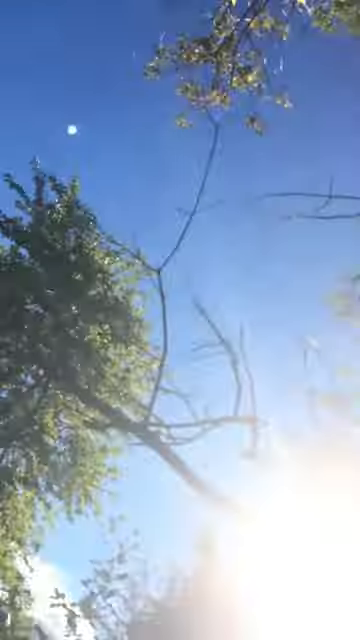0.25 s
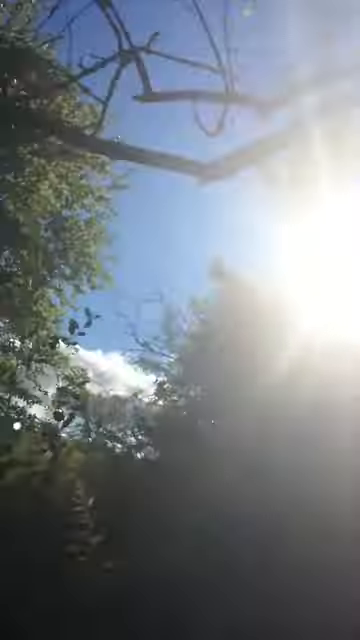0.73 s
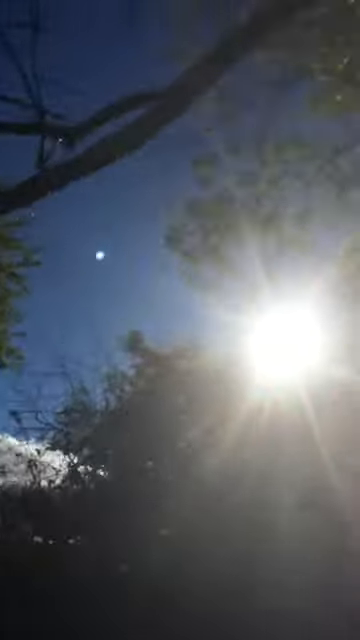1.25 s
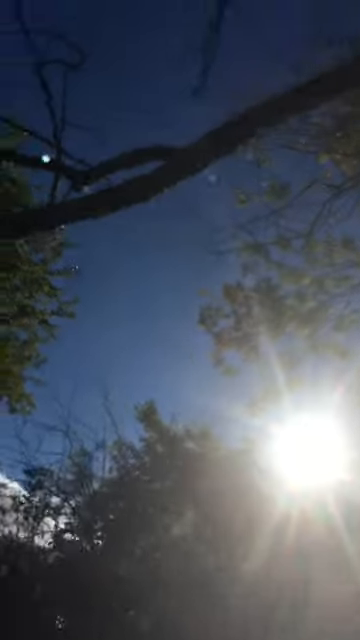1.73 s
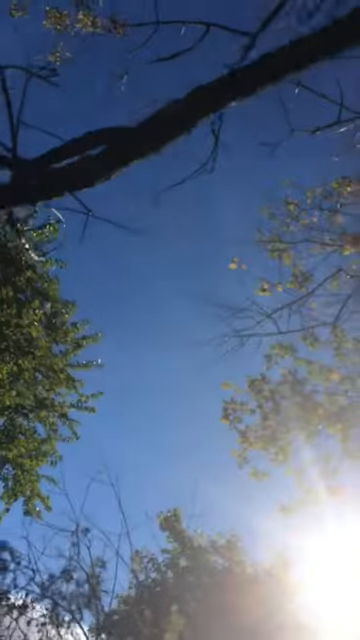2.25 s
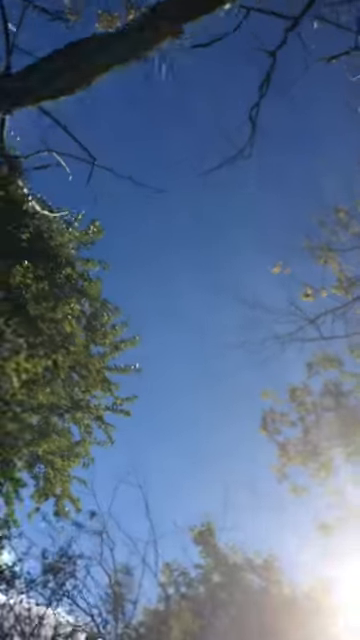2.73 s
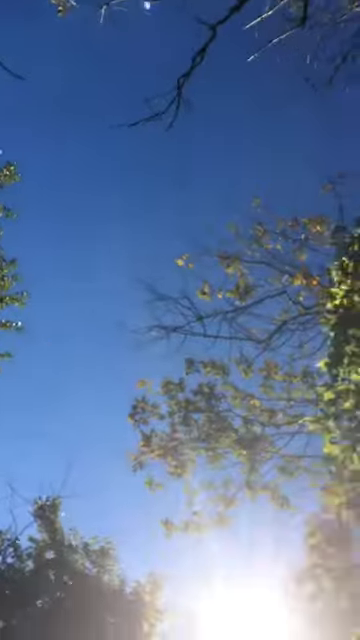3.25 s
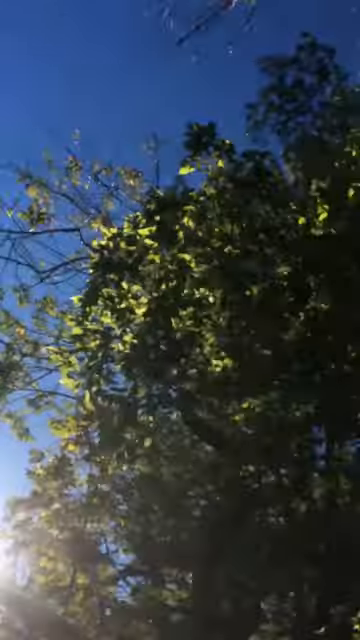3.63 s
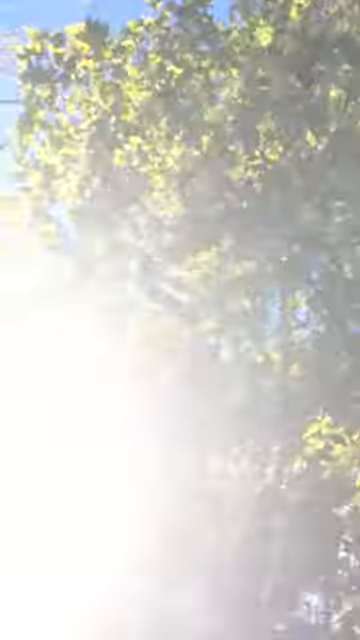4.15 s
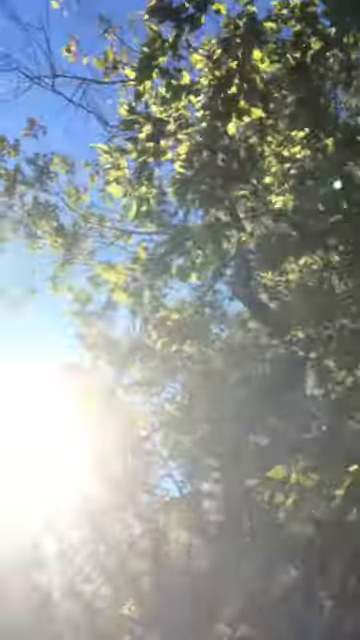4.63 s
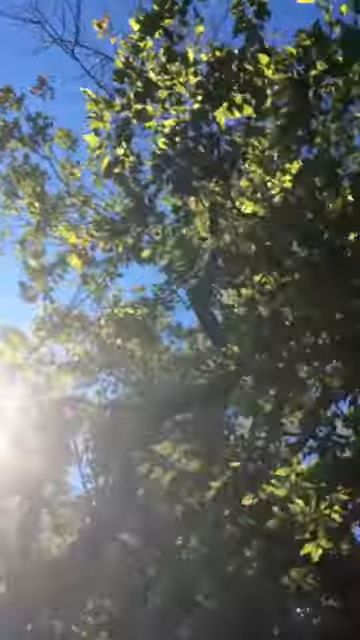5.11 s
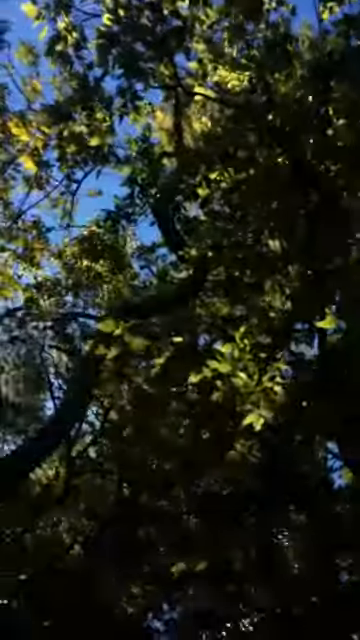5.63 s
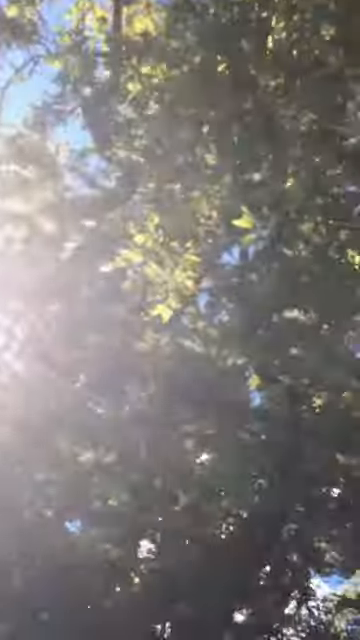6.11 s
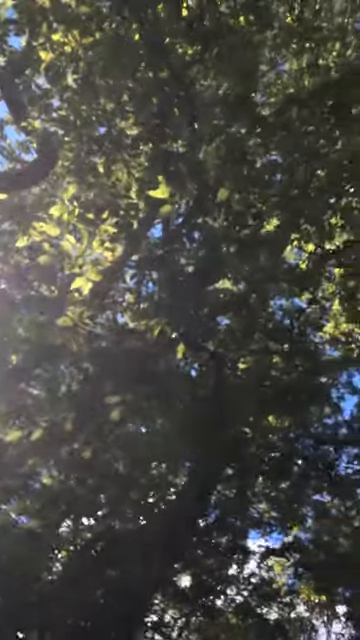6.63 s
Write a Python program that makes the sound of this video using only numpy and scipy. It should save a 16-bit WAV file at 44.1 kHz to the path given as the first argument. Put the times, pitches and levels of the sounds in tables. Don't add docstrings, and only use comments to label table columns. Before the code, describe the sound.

Quiet woodland with close, brittle footsteps: curled leaves crackle and slide, soles knock dully on hollow ground, and twigs snap. The sharpest crack comes early, a woody break follows at about two seconds, and a smaller one comes past five. Between them the rustle thins and a far bird gives thin, wavering whistles among the trees. Breeze stirs leaves, insects shimmer faintly, and low wind gently buffets the hand-held microphone.

```python
import sys
import numpy as np
from scipy import signal
from scipy.fft import rfft, irfft, next_fast_len
from scipy.io import wavfile
from scipy.ndimage import uniform_filter1d

SR = 44100
rng = np.random.default_rng(int(sys.argv[2]) if len(sys.argv) > 2 else 0)


def boost_factor(decibels):
    exponent = np.asarray(decibels, float) / 20
    return 10 ** exponent


def bounce(signal):
    frames = np.transpose(np.atleast_2d(signal))
    limited = np.clip(frames, -1, 1)
    pcm = np.round(limited * 32767).astype(np.int16)
    wavfile.write(sys.argv[1], SR, pcm)


N = 303097

# frequency in Hz, level in dB per Hz.
AIR_COLOUR = [(150, -17.5), (250, -1), (380, 7.5), (775, -4), (2090, -10.5), (2900, -39.5), (3500, -3),
              (4340, -13), (5800, -11), (7000, 0), (8500, -10), (10200, -16.5), (14700, -25.5), (16000, -9)]
# frequency in Hz, level in dB per Hz.
WIND_COLOUR = [(15, -42), (30, -16.5), (55, -4), (85, -12), (160, -4), (225, -6.5), (330, -19),
               (520, -38.5)]
# peak in seconds, level in dB, length in seconds.
GUSTS = [(0.0, -59, 0.16), (0.44, -67, .25), (1.02, -88, 0.06), (1.325, -60.5, 0.204), (1.596, -64, 0.496),
         (2.144, -58, 0.079), (2.562, -65, .15), (2.887, -59.5, 0.26), (3.432, -59.5, 0.21),
         (3.658, -67, .1), (4.285, -60, .12), (4.05, -65.5, 0.34), (4.917, -64, 0.4), (5.36, -61, .15),
         (5.85, -63, .3), (6.15, -63, 0.68), (6.735, -60, 0.31)]
# peak in seconds, level in dB, length in seconds.
JOLTS = [
    (0.414, -63, 0.066),
    (0.73, -62, 0.16),
    (1.036, -50.5, 0.027),
    (1.23, -53, .05),
    (1.359, -53, 0.04),
    (2.133, -61, 0.19),
    (5.338, -60, 0.23),
    (6.74, -71, .1),
]
# centre in Hz, width in Hz, level in dB.
INSECTS = [
    (7010, 90, -70.5),
    (7250, 170, -72.5),
    (5050, 610, -70.5),
    (6660, 290, -71),
]
# time in seconds, level in dB.
CHORUS = [(0.0, 0.1), (0.5, 2.5), (1.0, 2.5), (1.7, 0.1), (2.5, 0.1), (3.3, 0.1), (4.2, 0.1), (5.0, 0.1),
          (5.8, -1.5), (6.87, -1.5)]
# start in seconds, end in seconds, start in Hz, end in Hz, level in dB.
BIRD_NOTES = [(3.2, 3.29, 1150, 1270, -75), (3.36, 3.6, 1220, 1200, -79), (3.52, 3.585, 1720, 1880, -77),
              (3.575, 3.635, 1890, 1680, -72), (3.605, 3.66, 2880, 2860, -72),
              (3.625, 3.69, 2480, 2410, -70), (4.001, 4.192, 1230, 1210, -71),
              (4.45, 4.49, 2460, 2350, -71), (4.585, 4.635, 2710, 2700, -75), (4.615, 4.7, 2580, 2290, -76),
              (4.67, 4.705, 2330, 2290, -71), (4.689, 4.73, 2090, 2040, -74.5),
              (4.7, 4.772, 2000, 1860, -74), (4.785, 4.83, 2260, 2240, -72), (4.82, 4.93, 2250, 2210, -80),
              (4.92, 5.005, 2110, 2140, -75), (4.94, 5.21, 1950, 1835, -66.5),
              (5.18, 5.3, 1840, 1815, -67.5), (5.2, 5.335, 2100, 2090, -69), (5.29, 5.35, 1780, 1690, -72),
              (5.34, 5.43, 1680, 1880, -72), (5.337, 5.473, 2290, 2250, -68), (5.28, 5.39, 2590, 2560, -71),
              (5.26, 5.39, 2800, 2760, -73), (5.41, 5.54, 1900, 1850, -66.5), (5.89, 5.97, 1300, 1260, -72),
              (6.01, 6.1, 1280, 1250, -72), (6.22, 6.262, 2030, 2010, -77),
              (6.255, 6.295, 2070, 2090, -72.5), (6.252, 6.29, 2580, 2300, -74)]
# start in seconds, peak in dB, frequency in Hz, length in seconds.
KNOCKS = [(0.395, -48.5, 453, 0.02), (0.592, -51, 300, 0.0079), (0.752, -44, 450, 0.017),
          (1.2262, -35, 430, 0.005), (1.3655, -31, 454, 0.018), (1.387, -47, 410, 0.018),
          (1.563, -51.5, 394, 0.031), (1.696, -52, 360, 0.01), (2.128, -39, 415, 0.023),
          (2.206, -53, 406, 0.0083), (2.718, -51.5, 560, 0.012), (4.051, -61, 390, 0.016),
          (4.731, -53, 434, 0.016), (4.913, -56, 400, 0.0076), (5.094, -58, 380, 0.017),
          (5.338, -42, 456, 0.013), (5.412, -48.5, 450, 0.014), (5.848, -52, 432, 0.018),
          (5.904, -48.5, 463, 0.016), (6.039, -59, 455, 0.014), (6.704, -52, 443, 0.016)]
# start in seconds, peak in dB, frequency in Hz, length in seconds.
HEELS = [
    (0.549, -76, 110, 0.03),
    (1.025, -46, 150, 0.057),
    (1.2258, -38, 210, 0.012),
    (1.358, -46, 200, 0.018),
    (2.122, -48.5, 120, 0.029),
    (2.149, -62, 129, 0.026),
    (5.769, -50, 112, 0.017),
]
# start in seconds, peak in dB, frequency in Hz, T60 in seconds.
THUDS = [(0.452, -48.5, 651, 0.016), (0.524, -41.5, 663, 0.01), (0.748, -46.5, 783, 0.028),
         (1.193, -52, 1160, 0.02), (1.2243, -38, 1143, 0.012), (1.357, -46, 620, 0.027),
         (1.5605, -45, 776, 0.02), (1.681, -48, 1400, 0.015), (2.125, -40, 794, 0.023),
         (2.127, -33.5, 590, 0.026), (2.856, -46, 1070, 0.022), (4.048, -55, 696, 0.02),
         (5.329, -40.5, 676, 0.0093), (5.4055, -40, 760, 0.03)]
# start in seconds, peak in dB, frequency in Hz, T60 in seconds.
CLACKS = [
    (0.5241, -46, 1750, 0.016),
    (0.7484, -49, 1510, 0.019),
    (1.2239, -33, 1400, 0.03),
    (1.357, -40, 1800, 0.049),
    (2.125, -44, 2540, 0.04),
    (3.6256, -56, 2520, 0.015),
    (5.3304, -46, 2590, 0.015),
    (5.4085, -44, 2350, 0.0057),
]
# frequency in Hz, peak in dB, T60 in seconds.
STICKS = [
    (1.2244, .0003, [(1110, -28, .016), (1390, -22, .014), (1650, -26, .01), (2455, -33, .016), (3150, -21, .007), (3476, -14, .009), (3900, -12, .006), (4550, -12, .006), (5700, -22, .012), (6800, -20, .014), (7350, -20, .012), (7750, -16, .012), (8200, -20, .01)]),
    (1.3578, .0012, [(900, -44, .016), (1560, -40, .02), (1880, -36, .025), (2394, -35, .025), (3008, -30, .03), (4484, -36, .025), (5258, -29, .017), (6469, -32, .017), (8293, -31, .018), (13500, -44, .01)]),
    (2.1255, .0006, [(773, -28, .025), (980, -33, .012), (1505, -38, .016), (1870, -41, .016), (2386, -33, .022), (3124, -35, .022), (4000, -40, .012), (4600, -37, .012), (5119, -28, .02), (5600, -36, .012)]),
    (5.4082, .0006, [(1328, -44, .016), (2298, -35, .012), (3172, -34, .014), (3500, -37, .01), (3950, -36, .01), (4500, -31, .009), (5100, -25.5, .011), (7090, -43, .014), (8500, -42, .008), (11500, -36, .005)]),
    (1.528, .002, [(4900, -40, .035)]),
    (1.552, .0015, [(3700, -38, .02), (4400, -36, .02)]),
    (1.699, .001, [(5150, -48, .015)]),
    (1.73, .001, [(3300, -44, .02)]),
]
# start in seconds, peak in dB, crack in Hz, sizzle in dB against the crack.
TWIGS = [(0.3466, -45, 3280, -11), (0.365, -40, 6000, -4), (0.4513, -38.5, 3300, 1.5),
         (0.5257, -43, 3680, 3), (0.5404, -47, 5890, -5), (0.7484, -52, 4690, -7), (0.788, -48, 5250, -9),
         (0.867, -47, 4950, -7), (0.8998, -43.5, 4170, -10), (1.068, -42, 4410, -5),
         (1.5294, -46, 4800, -3), (1.5528, -42, 4000, -6), (1.699, -55, 5040, -6), (1.73, -54, 3300, -4),
         (1.7633, -49, 4460, -12), (2.2023, -44.5, 5140, -12), (2.717, -45, 3500, -9),
         (2.75, -44, 3240, -13), (2.7764, -49, 4300, -11), (2.857, -38, 3180, -12), (2.913, -40, 3940, -12),
         (2.976, -39, 4010, 2), (3.6256, -53, 4540, -9), (4.0476, -46.5, 3720, -14)]
# start in seconds, peak in dB, crack in Hz,
# sizzle in dB against the crack, splinter T60 in seconds.
NEAR_BREAKS = [
    (1.1942, -39.5, 3460, -6, 0.013),
    (1.2241, -19, 4300, 7, 0.02),
    (1.3585, -33, 4000, 4, 0.039),
    (1.3615, -35, 3300, -1.5, 0.023),
    (2.1258, -33, 4500, -1.5, 0.036),
    (5.3982, -38, 4600, 3, 0.011),
    (5.4082, -44, 3500, -3, 0.008),
    (5.4083, -40, 4760, -3, 0.0099),
]
# start in seconds, peak in dB, crack in Hz, sizzle in dB
CRACKLES = [(1.032, -44, 5500, -3), (1.052, -43, 3400, -6), (1.113, -43, 4300, -3), (1.24, -37, 6500, 1.5),
            (1.256, -35, 5500, 1.5), (1.265, -38, 6200, -1.5), (1.072, -42, 3800, 1.5),
            (1.15, -45, 4800, -3), (1.17, -45, 4400, -3), (2.81, -46, 4500, -4), (2.885, -45, 5000, -4),
            (2.94, -46, 3600, -4), (4.2, -50, 4200, -4), (4.27, -50, 3600, -4), (4.4, -51, 4600, -4),
            (1.545, -44, 4200, -3), (1.776, -47, 4600, -4), (3.63, -52, 3600, -4), (5.535, -50, 3300, -6),
            (5.615, -50, 4800, -6), (5.645, -51, 4600, -6), (5.713, -50, 4600, -1.5),
            (5.775, -49, 4000, -1.5), (5.9, -54, 3500, -3)]
# frequency in Hz, level in dB per Hz.
LEAF_COLOUR = [(120, -39), (250, 1), (450, -3), (800, -2.5), (1200, -1), (2000, -1.5), (2500, -3),
               (2950, -7), (3120, 7), (3900, 5.5), (5600, 3.5), (7200, 2.5), (8500, -3), (10300, -1),
               (12500, -5.5), (14800, -8), (16000, -8.5)]
# peak in seconds, crush in dB, rise in seconds, fall in seconds,
# sliding scuff in dB against the crush.
SHUFFLES = [(0.36, -56, .25, 0.79, -4.5), (0.53, -60, 0.26, 0.051, -2), (0.684, -55.5, 0.093, .12, -3.5),
            (0.9, -61.5, .2, 0.042, -5), (1.062, -45.5, 0.081, 0.17, -0.5), (1.21, -48.5, 0.1, 0.16, 1),
            (1.34, -49.5, 0.036, 0.084, -11), (1.551, -51.5, 0.13, 0.013, -6), (1.6, -61.5, 0.08, 0.15, 0),
            (1.764, -54, 0.051, 0.081, -7), (2.115, -54.5, 0.34, 0.3, -2.5), (2.69, -61.5, 0.048, .1, -2),
            (2.735, -50.5, 0.032, 0.31, -4), (2.9, -51, 0.26, 0.18, -4), (3.182, -62.5, .08, 0.21, 1.5),
            (3.63, -62, .04, .05, 1), (4.02, -67, 0.049, 0.14, 6), (4.116, -54.5, 0.17, 0.5, -5),
            (4.37, -62, 0.29, 0.2, -1.5), (5.097, -58, 0.14, 0.58, -4), (5.385, -63.5, 0.19, .07, -14),
            (5.558, -59, 0.34, 0.31, -5.5), (5.78, -59.5, 0.35, 0.06, -5), (5.87, -65, .08, .3, -9),
            (6.484, -56, 0.092, 0.075, -2.5)]
# peak in seconds, level in dB, rise in seconds, fall in seconds.
DRAGS = [
    (1.6, -63, .1, .12),
    (1.46, -63, .15, 0.34),
    (5.27, -64.5, 0.16, .1),
    (5.97, -64.5, 0.31, 0.26),
    (2.7, -68, .2, 0.37),
    (1.88, -65.5, 0.32, .15),
    (4.2, -64.5, 0.18, 0.26),
]
# time in seconds, level in dB.
BREEZE = [(0.0, -59), (0.25, -61), (0.94, -63), (1.45, -83), (1.7, -82), (1.9, -73), (2.4, -71.5),
          (2.62, -72.5), (3.6, -63.5), (3.9, -67.5), (4.5, -65), (4.72, -68), (4.95, -65.5), (5.28, -63.5),
          (5.4, -74), (5.56, -63.5), (6.1, -76.5), (6.6, -66.5), (6.87, -69)]

AIR_DB, CALM_DB, BUFFET_DB = -65.5, -76, -66.5
CLEAR_HZ, WAVER_HZ, WAVER_PER_HZ = 1850, 11.5, 0.045
TWIG_T60_S, SIZZLE_HZ, SIZZLE_SPREAD = 0.025, 7510, 0.025
TICK_DB, TICK_HZ, TICK_TOP_DB = -6.5, 2000, -39.5
STROKE_DB = 14.5
DRAG_DB, FIZZ_DB = -1.5, -0.5
BREEZE_CRUSH_DB, BREEZE_FIZZ_DB, BREEZE_DRAG_DB = -11.5, 3.0, -72
DRAG_FOLLOWS = 0.33
EDGE_HZ = 15400


def evened(x):
    return x / np.sqrt(np.mean(x ** 2) + 1e-20)


def read(points, hz):
    f, value = np.transpose(points)
    return np.interp(np.log(hz + 1), np.log(f + 1), value)


def curve(rows):
    s, value = np.transpose(rows)
    return np.interp(np.arange(N) / SR, s, value)


def add(mix, s, sound):
    part = mix[round(s * SR):][:len(sound)]
    part += sound[:len(part)]


def colour(x, points):
    size = next_fast_len(len(x))
    gain = boost_factor(read(points, np.fft.rfftfreq(size, 1 / SR)))
    return evened(irfft(rfft(x, size) * gain, size)[:len(x)])


def band(x, lo_hz, hi_hz):
    return signal.sosfilt(signal.butter(2, [lo_hz, hi_hz], "band", fs=SR, output="sos"), x)


def drift(seconds):
    size = max(round(seconds * SR), 2)
    once = uniform_filter1d(rng.standard_normal(N), size)
    return evened(uniform_filter1d(once, size))


def patchy(points, patchy_db):
    frames, hz = N // 128 + 5, np.fft.rfftfreq(512, 1 / SR)
    a, b, patches = rng.standard_normal((frames, 257, 3)).T
    patches = evened(uniform_filter1d(uniform_filter1d(patches, 7, 0), 20, 1))
    z = (a + 1j * b) * boost_factor(read(points, hz)[:, None] + patchy_db * patches)
    return evened(signal.istft(z, nperseg=512, noverlap=384)[1][:N])


def strokes(s, db, rise, fall):
    late = np.arange(0, N, 64)[None] / SR - s[:, None]
    before = -late / np.maximum(rise, 0.01)[:, None]
    after = late / np.maximum(fall, 0.01)[:, None]
    return boost_factor(2 * (db[:, None] - STROKE_DB * np.maximum(before, after)))


def level(power):
    return np.interp(np.arange(N), np.arange(0, N, 64), np.sqrt(power))


def struck(noise, hz, width, t60, sharp=8.0):
    t = np.arange(len(noise)) / SR
    splinters = (t == 0) * sharp + noise * boost_factor(-60 * t / t60)
    ring = band(splinters, hz / width, hz * width)
    return ring / abs(ring).max()


def air():
    return boost_factor(AIR_DB) * patchy(AIR_COLOUR, 2.55)


def swells(rows, floor_db):
    s, db, length = np.transpose(rows)
    return level(strokes(s, db, length, length).sum(0) + boost_factor(2 * floor_db))


def wind():
    port = evened(band(rng.standard_normal(N), 68, 102))
    buffet = colour(rng.standard_normal(N), WIND_COLOUR)
    pressure = 0.92 * swells(GUSTS, CALM_DB) * port + swells(JOLTS, BUFFET_DB) * buffet
    return boost_factor(1.73 * drift(0.041)) * pressure


def insects():
    mix, chorus_db = np.zeros(N), curve(CHORUS)
    for hz, width_hz, db in INSECTS:
        throb_db = 2.06 * drift(0.035) + 1.6 * drift(0.16)
        shimmer = evened(band(rng.standard_normal(N), hz - width_hz / 2, hz + width_hz / 2))
        mix += boost_factor(db + chorus_db + throb_db) * shimmer
    return mix


def bird():
    mix, waver = np.zeros(N), drift(0.0044)
    for start, end, start_hz, end_hz, db in BIRD_NOTES:
        waver_hz = WAVER_HZ + WAVER_PER_HZ * abs(start_hz - CLEAR_HZ)
        size = round((end - start) * SR)
        hz = np.linspace(start_hz, end_hz, size) + waver_hz * waver[round(start * SR):][:size]
        whistle = np.sin(2 * np.pi * np.cumsum(hz) / SR) * signal.windows.tukey(size, 0.35)
        add(mix, start, boost_factor(db + 4) * whistle)
    t = np.arange(9000) / SR
    trunks = rng.standard_normal(9000) * boost_factor(-60 * t / 0.3)
    smear = signal.oaconvolve(mix, trunks / np.linalg.norm(trunks))[:N]
    return mix * boost_factor(2.0 * drift(0.02)) + 0.42 * smear


def knocks(rows):
    mix = np.zeros(N)
    for s, db, hz, length in rows:
        t = np.arange(round(3 * max(length, 0.004) * SR)) / SR
        x = t / length
        swell = (x * 2.52) ** 0.56 * np.exp(1.5 - 1.33 * x * 3.14 - 0.6 * x ** 4)
        add(mix, s - 0.002, boost_factor(db) * swell * np.sin(2 * np.pi * hz * t))
    return mix


def thuds(rows, width):
    mix = np.zeros(N)
    for s, db, hz, t60 in rows:
        add(mix, s + 0.000965, boost_factor(db) * struck(rng.standard_normal(2000), hz, width, t60))
    return mix


def sticks():
    mix, t = np.zeros(N), np.arange(3000) / SR
    for s, swell, modes in STICKS:
        rise = 1 - np.exp(-(t / max(swell, 1e-4)) ** 2)
        ring = np.zeros(len(t))
        for hz, db, t60 in modes:
            ring += boost_factor(db - 60 * t / t60) * np.cos(2 * np.pi * hz * (t - swell))
        add(mix, s, -rise * ring)
    return mix


def snaps(near, twigs, rings):
    breaks = near + [(*row, TWIG_T60_S) for row in twigs]
    crack, sizzle = rings.copy(), np.zeros(N)
    for s, db, hz, sizzle_db, t60 in breaks:
        noise = rng.standard_normal((3, 1500))
        sizzle_hz = SIZZLE_HZ * (1 + SIZZLE_SPREAD * noise[1, 0])
        top_db, tick_db = db + sizzle_db - 9.0, min(db + TICK_DB, TICK_TOP_DB)
        add(crack, s + 0.0006, -boost_factor(db) * struck(noise[0], hz, 1.187, t60, sharp=3.0))
        add(sizzle, s + 0.0005, -boost_factor(db + sizzle_db) * struck(noise[1], sizzle_hz, 1.237, t60))
        add(sizzle, s + 0.0005, -boost_factor(top_db) * struck(noise[2], 10300, 1.32, 1.6 * t60, sharp=3.0))
        add(crack, s + 0.0006, boost_factor(tick_db) * struck(noise[2], TICK_HZ, 2.6, 0.4 * t60))
    t = np.arange(5000) / SR
    decay = boost_factor(-60 * t / 0.0295) + 0.32 * boost_factor(-60 * t / 0.28)
    scatter = rng.standard_normal((2, 5000)) * decay
    scatter = scatter / np.linalg.norm(scatter[0]) * boost_factor([[-11.0], [-3.0]])
    echoes = signal.oaconvolve(np.array([crack, sizzle]), scatter, axes=1)[:, :N].sum(0)
    return crack + sizzle + echoes


def leaf_cracks():
    busy = 2500 / SR * boost_factor(2.3 * drift(0.006))
    size = boost_factor(2.9 * np.minimum(rng.exponential(1, N), 5)) * (rng.random(N) < busy)
    leaf, t, cracks = rng.integers(0, 16, N), np.arange(500) / SR, np.zeros(N)
    for k, hz in enumerate(np.geomspace(500, 14000, num=16)):
        ring = np.sin(2 * np.pi * hz * t) * np.exp(-t * hz / 2.9) * np.minimum(t * hz / 1.22, 1)
        cracks += signal.oaconvolve(size * (leaf == k), ring * hz / 3500)[:N]
    return cracks


def litter():
    fast = next_fast_len(N)
    spectrum = rfft(leaf_cracks(), fast)
    flat = irfft(spectrum / uniform_filter1d(abs(spectrum) + 1e-9, 3000), fast)[:N]
    mixed = 0.58 * colour(flat, LEAF_COLOUR) + 0.99 * patchy(LEAF_COLOUR, 1.6)
    return mixed * boost_factor(0.96 * drift(0.0053))


def leaf_powers():
    s, db, rise, fall, scuff_db = np.transpose(SHUFFLES)
    feet, breeze_db = strokes(s, db, rise, fall), curve(BREEZE)[::64]
    scuff = (feet * boost_factor(2 * scuff_db)[:, None]).sum(0)
    low_breeze_db = BREEZE_DRAG_DB + DRAG_FOLLOWS * (breeze_db - breeze_db.mean())
    drag = scuff * boost_factor(2 * DRAG_DB) + boost_factor(2 * low_breeze_db) + strokes(*np.transpose(DRAGS)).sum(0)
    crush = feet.sum(0) + boost_factor(2 * (breeze_db + BREEZE_CRUSH_DB))
    fizz = scuff * boost_factor(2 * FIZZ_DB) + boost_factor(2 * (breeze_db + BREEZE_FIZZ_DB))
    return drag, crush, fizz


def leaves():
    fast = next_fast_len(N)
    spectrum, hz = rfft(litter(), fast), np.fft.rfftfreq(fast, 1 / SR)
    heavy = 1 / (1 + (hz / 3020) ** 40)
    fine = 1 / (1 + (7600 / (hz + 1)) ** 8)
    mix = np.zeros(N)
    for share, power in zip((heavy, 1 - heavy - fine, fine), leaf_powers()):
        mix += evened(irfft(spectrum * share, fast)[:N]) * level(power)
    return mix


def scene():
    background = air() + wind() + insects() + bird()
    ground = knocks(KNOCKS) + knocks(HEELS)
    wood = thuds(THUDS, 1.25) + thuds(CLACKS, 1.217) + snaps(NEAR_BREAKS, TWIGS, sticks())
    litter_mix = leaves() + snaps([], CRACKLES, np.zeros(N))
    return (background + ground + wood + litter_mix)[None]


def top_cut(x):
    return signal.sosfilt(signal.butter(12, 16470, fs=SR, output="sos"), x)


def record(dry):
    low_pass = signal.firwin(1023, EDGE_HZ, window=("kaiser", 4), fs=SR)
    limited = signal.oaconvolve(dry, low_pass[None], "same")
    return top_cut(limited + boost_factor(-36) * (dry - limited))


dry = scene()
out = record(dry)
bounce(out)
```